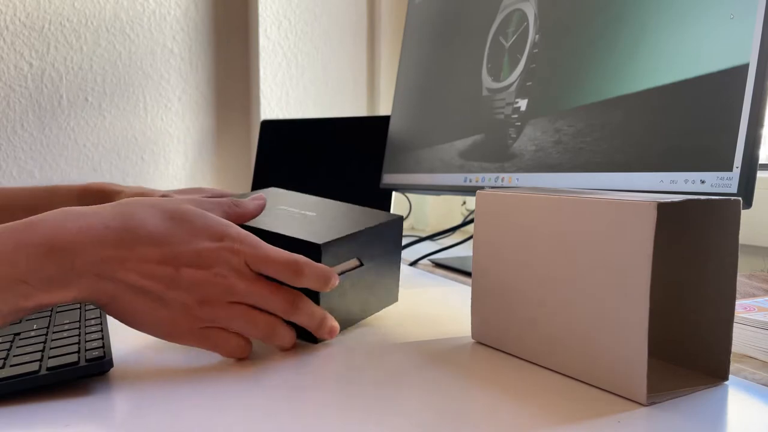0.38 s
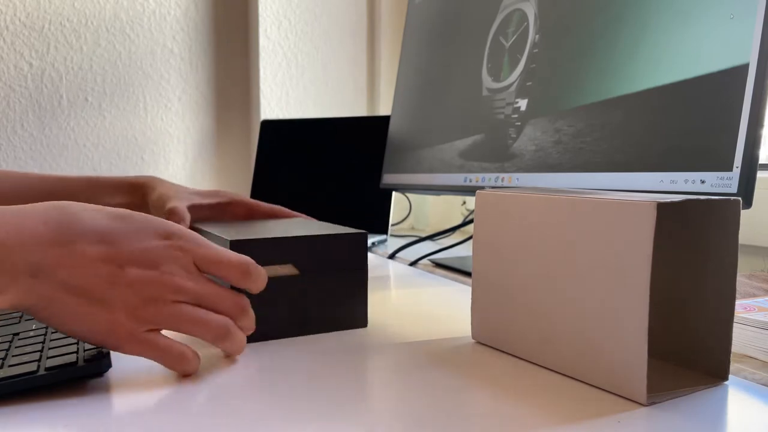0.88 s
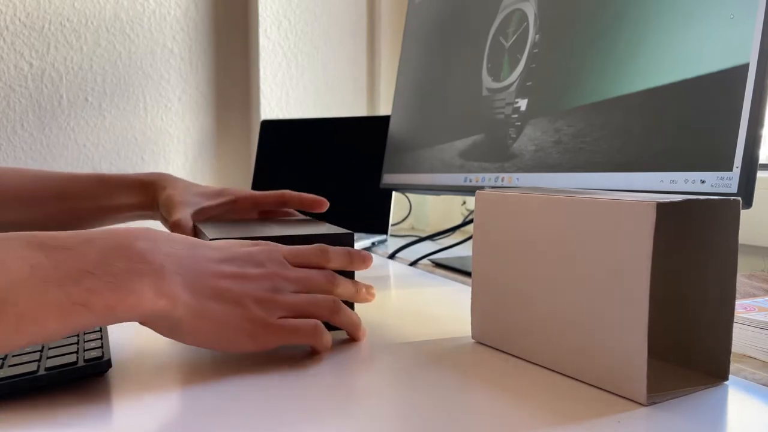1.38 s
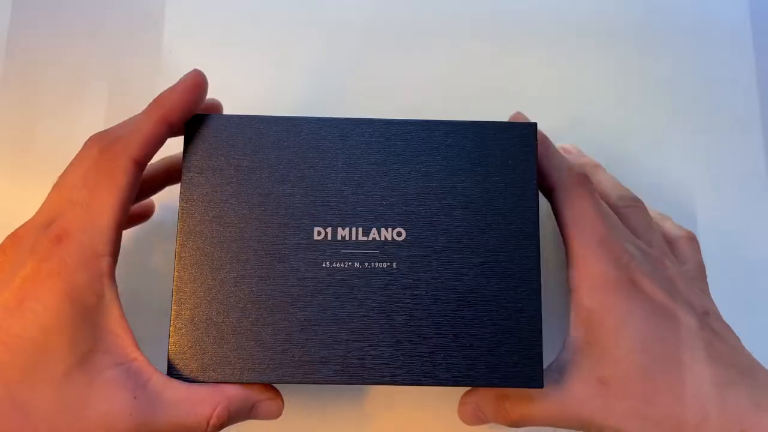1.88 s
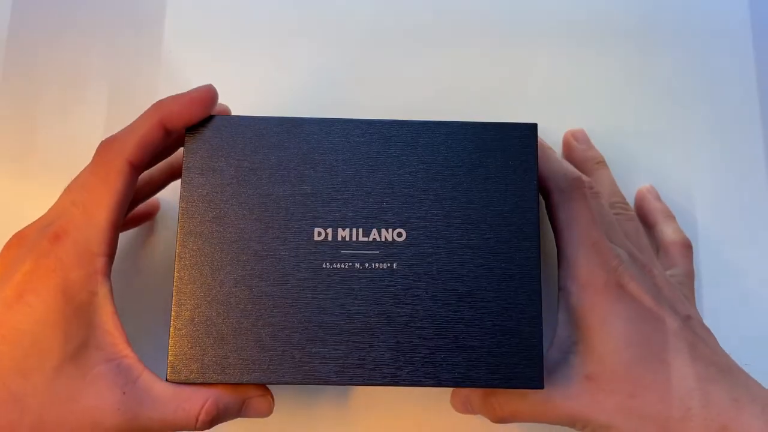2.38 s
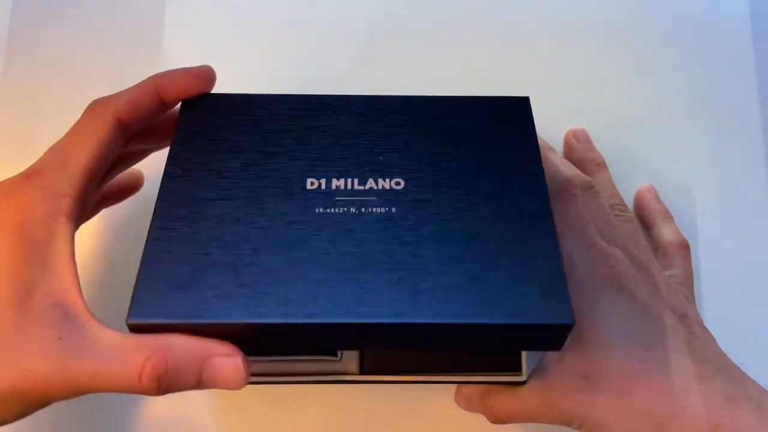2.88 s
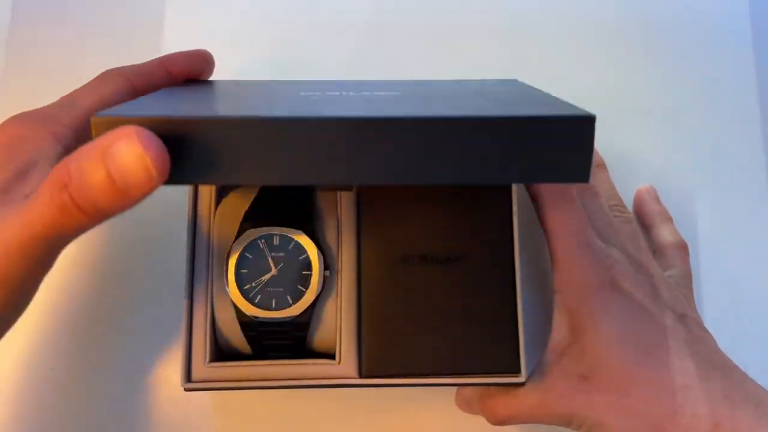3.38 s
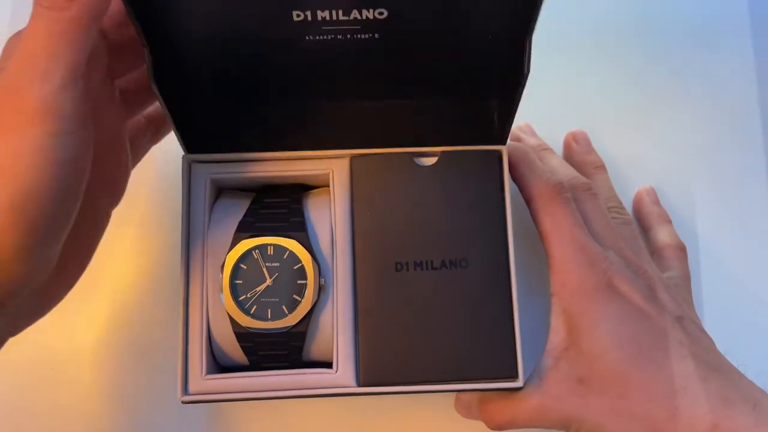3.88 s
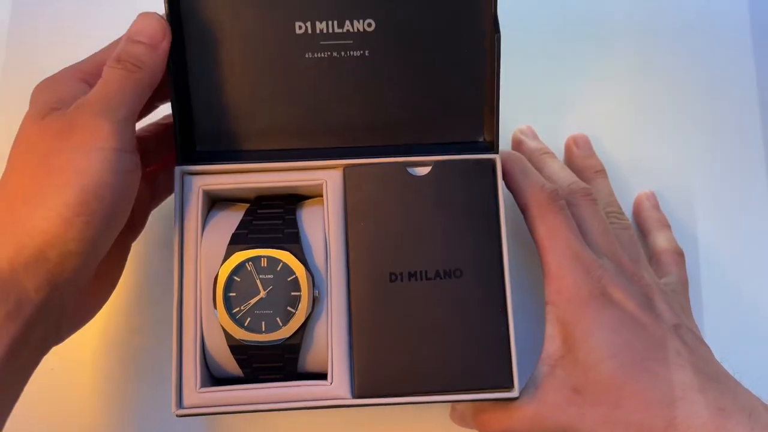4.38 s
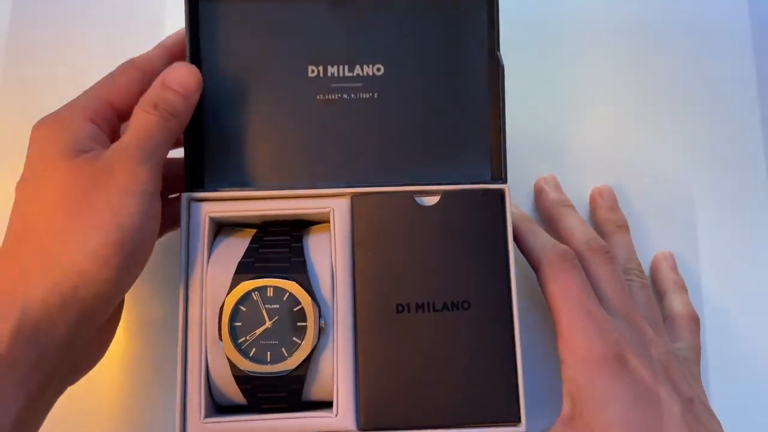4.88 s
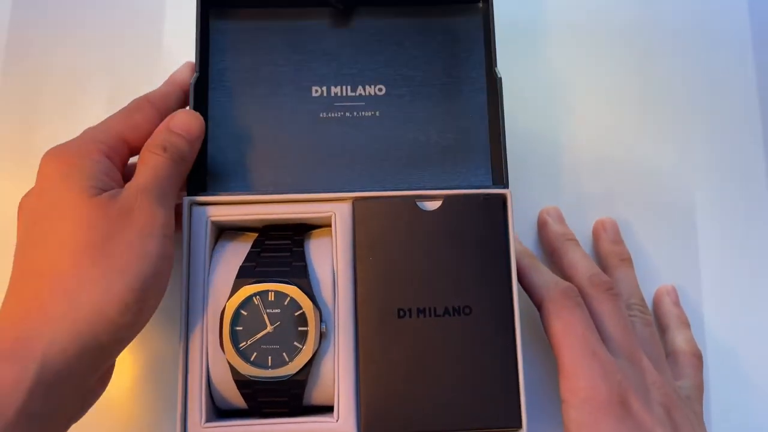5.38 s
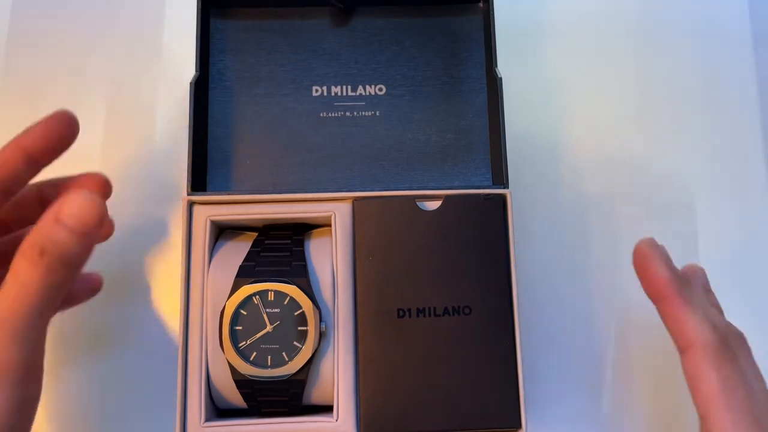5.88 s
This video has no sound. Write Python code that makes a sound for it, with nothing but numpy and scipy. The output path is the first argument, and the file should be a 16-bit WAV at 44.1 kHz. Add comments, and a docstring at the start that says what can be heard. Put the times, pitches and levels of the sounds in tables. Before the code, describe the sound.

Three hollow knocks of a cardboard box on a desk, then quiet lid taps, light scrapes and a low room hum that swells.

```python
"""Hands set a stiff cardboard box down on a wooden desk (three knocks): each push rings box panels and desk top.
They slide the box; then, in a second shot heard from close above, lift its lid: soft taps made in the same way.
Filtered noise makes the rest: short bursts for skin and paper ticks, long swells for card and fingertip rubs.
Fading noise rings as a small room; low wavering noise is a fan and far traffic humming through desk and walls."""
import sys
import numpy as np
from scipy import signal
from scipy.fft import rfft, irfft
from scipy.io import wavfile
from scipy.ndimage import uniform_filter1d

SR = 44100
rng = np.random.default_rng(int(sys.argv[2]) if len(sys.argv) > 2 else 0)


def invert_db(x):
    """Field ratio 10**(x/20) for x, a level in decibels (scalar or array-like)."""
    u = np.asarray(x, float) / 20
    return 10 ** u


def store_pcm(level_fs):
    """Save levels as 16-bit WAV."""
    pcm = np.round(np.clip(level_fs, -1, 1) * 32767).astype(np.int16)
    wavfile.write(sys.argv[1], SR, np.atleast_2d(pcm).T)


N = 264600  # samples: six seconds

T = np.arange(N) / SR  # time of each sample [s]
STEPS = T[::SR // 500]  # coarser times for slow level curves [s]
HZ = np.maximum(np.fft.rfftfreq(N, 1 / SR), 1)
CUT_S = 1.812  # cut between two shots, the second from close above [s]


def colour(table):
    """Gain at every frequency, drawn through (frequency [Hz], gain [dB]) points."""
    hz, db = np.transpose(table)
    return invert_db(np.interp(np.log(HZ), np.log(hz), db))


def shape(x, gain):
    """Filters a sound and brings it to rms 1."""
    y = irfft(rfft(x) * gain, N)
    return y / y.std()


def placed(x, near, above):
    """Gives a sound one colour before the cut and another after."""
    return np.where(T < CUT_S, shape(x, colour(near)), shape(x, colour(above)))


def band(lo_hz, hi_hz):
    """Gain that lets a band through, with soft edges."""
    low_edge = 1 + (lo_hz / HZ) ** 6
    high_edge = 1 + (HZ / hi_hz) ** 6
    return 1 / np.sqrt(low_edge * high_edge)


def walk(rate_hz, count=N):
    """Random levels, each held for 1 / rate_hz seconds, joined by straight slopes."""
    hold = int(SR / rate_hz)
    levels = rng.standard_normal(count // hold + 1)
    return uniform_filter1d(np.repeat(levels, hold), hold)[:count]


def grit(spread_db, flicker_db):
    """Noise as dense tiny catches of uneven size, with a flickering level."""
    level_db = spread_db * rng.exponential(size=N) + flicker_db * walk(40)
    return rng.standard_normal(N) * invert_db(level_db)


def swells(rows):
    """One gain curve per row, rising to its peak and falling away at steady dB rates."""
    peak_s, rise_s, fall_s, db = np.transpose(rows)[:4, :, None]
    distance = np.maximum((peak_s - STEPS) / rise_s, (STEPS - peak_s) / fall_s)
    return invert_db(db - 20 * distance)


def together(*gains):
    """Unrelated sounds add in power; the sum becomes one gain per sample."""
    power = (np.vstack(gains) ** 2).sum(axis=0)
    return np.interp(T, STEPS, np.sqrt(power))


# how the hum's level drifts: (time [s], drone level [dB], rumble level [dB])
HUM_LEVELS = [(0.0, -68, -68), (0.2, -68, -70), (1.2, -62, -64), (1.5, -66, -66), (1.8, -63, -68),
              (1.9, -70, -70), (2.35, -72, -68), (2.45, -63, -66), (2.85, -67, -63), (3.36, -72, -68),
              (3.45, -64, -65), (3.8, -61, -62), (4.18, -60.5, -59), (4.54, -58, -57), (4.75, -54.5, -55),
              (5.1, -57, -60), (5.35, -56.5, -56), (5.65, -58.5, -59), (6.0, -58, -55)]
# slow swells of low rumble and desk drone, some under the lid drag:
# (peak time [s], rise [s per 20 dB], fall [s per 20 dB], rumble level [dB], desk drone above rumble [dB])
LOW_SWELLS = [(1.2, .6, .6, -70, 9), (2.1, .5, .5, -72, 8), (2.56, .2, .3, -53, 4),
              (2.67, .15, .2, -44, -5), (3.22, .25, .11, -57, -18), (3.94, .2, .08, -58, 5)]
# colour of the drone and rumble: (frequency [Hz], gain [dB])
DRONE_COLOUR = [(12, -41), (20, -10.5), (69, 1), (92, -2.5), (145, -4.5), (221, -7.5), (255, -1.5),
                (281, -1), (305, -1.5), (324, -21), (351, -9), (556, -13), (666, -8), (1320, -20.5),
                (2400, -45), (3120, -66), (5280, -120)]
# resonances of desk and room: (frequency [Hz], width [Hz], height [dB])
DRONE_PEAKS = [(75, 35, 6), (276, 22, 7), (690, 60, 4)]
# colour of the still floor: (frequency [Hz], gain [dB])
STILL_COLOUR = [(12, -28.5), (20, -1), (60, 1.5), (199, -4), (287, -9), (359, -11.5), (685, -16),
                (2420, -36.5), (5930, -39), (7220, -43), (7850, -55), (12300, -46.5), (16300, -57.5)]
STILL_DB = -62.5
DESK_NEAR_DB, DESK_ABOVE_DB = -1, 2.5  # desk drone over the drone level, before and after the cut


def hum():
    """Low noise in three wavering layers, with resonances of desk and room, over a still floor."""
    s, drone_db, rumble_db = np.transpose(HUM_LEVELS)
    drone = invert_db(np.interp(STEPS, s, drone_db))
    rumble = invert_db(np.interp(STEPS, s, rumble_db))
    rumble_swells = swells(LOW_SWELLS)
    desk_swells = rumble_swells * invert_db(np.array(LOW_SWELLS)[:, 4:])
    desk_db = np.where(STEPS < CUT_S, DESK_NEAR_DB, DESK_ABOVE_DB)
    layers = [  # gain, lowest Hz, highest Hz, waver in dB
        (together(rumble, rumble_swells), 15, 160, 2.5),
        (together(drone * invert_db(desk_db), desk_swells), 160, 450, 2.5),
        (together(drone), 450, 2600, 1.2),
    ]
    peaks = invert_db(sum(db / (1 + (2 * (HZ - hz) / width) ** 2) for hz, width, db in DRONE_PEAKS))
    out = invert_db(STILL_DB) * shape(rng.standard_normal(N), colour(STILL_COLOUR))
    for gain, lo_hz, hi_hz, waver_db in layers:
        tone = colour(DRONE_COLOUR) * peaks * band(lo_hz, hi_hz)
        layer = shape(rng.standard_normal(N), tone)
        out = out + gain * invert_db(waver_db * walk(11)) * layer
    return out


# how strong the hum's side signal is: (frequency [Hz], gain [dB])
HUM_SIDE = [(60, -17.5), (110, -5.5), (200, -15.5), (380, -2), (700, -0.5), (1290, 0.5), (2380, 4),
            (4400, 0.5), (8120, 0.5), (15000, -12)]


def hum_all_round():
    """Hum arriving from all round: the side signal is a second, unrelated stretch of noise."""
    mid = hum()
    side = irfft(rfft(hum()) * colour(HUM_SIDE), N)
    return np.array([mid + side, mid - side])


# how the room's tail dies away: (band centre [Hz], time to fall 60 dB [s], level [dB])
ROOM_BANDS = [(100, 0.34, -6), (253, .5, -5), (500, 0.82, -4.5), (1000, 0.45, 0.5), (2000, 0.65, 0),
              (4030, .55, 6), (8000, 0.1, -4.5)]


def room(x):
    """Diffuse tail: octave bands of noise dying at their own rates, mid and an unrelated twin."""
    tails = np.zeros((2, N))
    for hz, t60, db in ROOM_BANDS:
        build_up = 1 - np.exp(-(T / 0.0027) ** 2)
        fade = invert_db(db) * np.exp(-np.log(1000) * T / t60) * build_up
        octave = band(hz / np.sqrt(2), hz * np.sqrt(2))
        tails += fade * irfft(rfft(rng.standard_normal((2, N))) * octave, N)
    return irfft(rfft(tails / np.sqrt(SR / 20)) * rfft(x), N)


# side signal of the microphone pair, before and after the cut: (frequency [Hz], gain [dB])
SIDE_NEAR = [(60, -13), (110, -10.5), (200, -9), (380, -5), (700, -0.5), (1290, -1), (2380, -2), (4400, -4),
             (8120, 0), (15000, 7)]
SIDE_ABOVE = [(60, -13), (110, -55), (200, -36), (380, 2), (700, 6), (1290, -5), (2380, 7.5), (4400, -3),
              (8120, 24.5), (15000, -8)]


def ports(mid, other):
    """Two microphone ports: the side signal is the same sound turned in phase, plus an unrelated one."""
    # the bass leans to the right port; higher up the ports differ by time, a quarter turn
    lean = 1 / (1 + (HZ / 350) ** 4)
    mid_f, other_f = rfft(mid), rfft(other)
    near_turn = np.exp(1j * (np.pi / 2 + 0.05 + 1.2 * lean))
    above_turn = np.exp(1j * (np.pi / 2 + 0.1 + 0.76 * lean))
    near = (0.71 * mid_f * near_turn + 1.2 * other_f) * colour(SIDE_NEAR)
    above = (0.3 * mid_f * above_turn + 0.26 * other_f) * colour(SIDE_ABOVE)
    side = np.where(T < CUT_S, irfft(near, N), irfft(above, N))
    return np.array([mid + side, mid - side])


# swells of card body and scrape: slides, and at .67 the dying tail of the third knock:
# (peak time [s], rise [s per 20 dB], fall [s per 20 dB], card body level [dB], scrape above body [dB])
CARD_SWELLS = [(.22, .1, .3, -71, -12), (.46, .12, .6, -50, -11), (.67, .04, .24, -39, -24),
               (.94, .6, .1, -61, -3), (1.064, .05, .07, -60, -12), (1.7, .2, .25, -68, -20),
               (2.43, .03, .3, -65, -30), (2.628, .045, .1, -45, -16), (2.9, .3, .3, -70, -22),
               (3.17, .15, .15, -73, -15), (3.43, .03, .2, -64, -14), (3.67, .15, .25, -66, -22),
               (3.85, .16, .3, -68, -9), (3.946, .09, .055, -59.5, -16), (4.21, .08, .2, -67, -15),
               (4.35, .2, .07, -72, -9), (4.65, .19, .26, -53, -14), (4.83, .15, .11, -52.5, -11),
               (5.094, .12, .8, -76, -6)]
# fingertips brushing paper: (peak time [s], rise [s per 20 dB], fall [s per 20 dB], hiss level [dB])
BRUSHES = [(.214, .05, .4, -83), (.46, .06, .2, -84), (.6, .2, .15, -78), (.9, .6, .5, -83),
           (1.064, .04, .055, -60.5), (1.2, .4, .17, -75), (1.9, .15, .4, -85), (2.628, .047, .08, -68.5),
           (3.17, .25, .15, -85), (3.78, .12, .3, -85), (3.946, .12, .1, -74.5), (4.16, .08, .3, -85),
           (4.37, .15, .07, -87), (4.65, .3, .4, -85), (4.842, .13, .08, -69), (5.15, .3, .9, -92)]
# faint rubbing that never stops: (scrape level [dB], body level [dB], skin level [dB])
HOLD_DB = (-90, -85, -100)
# colour of the humming box body: (frequency [Hz], gain [dB])
BODY_COLOUR = [(410, -35.5), (700, -6), (948, 2.5), (1170, -6.5), (1650, -5), (2230, -11.5), (2620, -17),
               (3500, -20.5), (4550, -47.5), (7700, -120)]
# colour of scraping card, before and after the cut: (frequency [Hz], gain [dB])
CARD_NEAR = [(1470, -31), (2500, -1), (5020, -4.5), (6220, -9.5), (7960, -26.5), (9000, -16), (11700, -53),
             (19800, -120)]
CARD_ABOVE = [(1470, -24), (2500, -11.5), (2900, 1), (6120, -5), (7500, -20), (8090, -42), (9000, -26),
              (11700, -62), (19800, -120)]
# colour of skin, in rubs and ticks, before and after the cut: (frequency [Hz], gain [dB])
SKIN_NEAR = [(4120, -39), (7000, -7.5), (7980, -10.5), (9260, -4.5), (11000, 0.5), (13600, -9),
             (14500, -27.5)]
SKIN_ABOVE = [(4410, -25), (7500, -8), (8460, -40), (8880, -8), (9750, -2.5), (12200, -1), (14500, 2.5),
              (15500, -0.5), (16300, -13.5)]
HOLD_WANDER_DB = 3.5
BRUSH_SCRAPE_DB = 2  # card scrape over the hiss of each brush


def rub():
    """Card scrapes card, the box body hums along, fingertips hiss over the paper."""
    card_swells, brushes = swells(CARD_SWELLS), swells(BRUSHES)
    hold = [invert_db(db + HOLD_WANDER_DB * np.interp(STEPS, T, walk(6))) for db in HOLD_DB]
    scrape_swells = card_swells * invert_db(np.array(CARD_SWELLS)[:, 4:])
    card = together(scrape_swells, brushes * invert_db(BRUSH_SCRAPE_DB), hold[0])
    body = together(card_swells, hold[1])
    skin = together(brushes, hold[2])
    scrape = card * placed(grit(1.5, 1.8), CARD_NEAR, CARD_ABOVE)
    body_hum = body * shape(grit(1.5, 1.2), colour(BODY_COLOUR))
    hiss = skin * placed(grit(1.2, 1.2), SKIN_NEAR, SKIN_ABOVE)
    return scrape + body_hum + hiss


# dry ticks of skin and paper letting go:
# (time [s], thin paper level [dB], card level [dB], skin level [dB])
TICKS = [(0.207, -80, -64, -90), (0.2897, -68.5, -47, -77), (0.4369, -63, -28, -61),
         (0.6476, -51, -23.5, -56), (1.227, -82, -63, -85), (1.656, -67.5, -68.5, -78),
         (2.5187, -79, -68, -69), (2.5601, -85, -70, -70), (2.5888, -84, -73, -68.5),
         (2.6044, -78, -59, -60), (2.6314, -58, -46, -57), (2.8878, -73, -80, -74), (2.8955, -63, -82, -69),
         (2.9213, -89, -75.5, -72), (3.0318, -67, -57, -61.5), (3.4102, -62, -49, -73),
         (3.5392, -73, -58, -86), (4.432, -90, -64, -88)]


def ticks():
    """Noise bursts a few milliseconds long: thin paper, thicker card and skin each add their band."""
    rise_s = np.array([[0.0012], [0.0015], [0.0008]])  # time to the peak: thin, card, skin
    t = T[:SR // 40] / rise_s
    pulse = t * np.exp(1 - t)
    length = t.shape[1]
    gates = np.zeros((3, N + length))
    for s, *db in TICKS:
        i = int(s * SR)
        gates[:, i:i + length] += invert_db(np.array(db))[:, None] * pulse
    thin, card, skin = gates[:, :N]
    air = rng.standard_normal(N)
    thin_snap = thin * shape(air, band(3800, 7000) ** 2)
    card_snap = card * shape(air, band(1100, 2700) ** 2)
    skin_snap = skin * placed(air, SKIN_NEAR, SKIN_ABOVE)
    return thin_snap + card_snap + skin_snap


def ring(modes, t, swing):
    """Struck modes of alternating sign, one row each: they swing in over about `swing` cycles, then die."""
    hz, db, t60 = np.transpose(modes)[..., None]
    sign = (-1.) ** np.arange(len(hz))[:, None]
    fade = (1 - np.exp(-t * hz / swing)) * np.exp(-np.log(1000) * t / t60)
    return sign * invert_db(db) * np.sin(2 * np.pi * hz * t) * fade


def spot(modes, hz, width):
    """The struck spot favours the modes near its own pitch: weight 1 there, less further away."""
    return np.exp(-(np.log(np.array(modes)[:, 0] / hz) / width) ** 2)


# blows of box on desk and lid on box:
# (time [s], box peak level [dB], box ring pitch [Hz], contact [ms], desk gain over box level [dB])
BLOWS = [(0.205, -50, 1500, .3, -17), (0.229, -44, 520, 0.58, -12), (0.2896, -14, 900, 0.61, -6),
         (0.2928, -16, 380, 0.2, -18), (0.429, -30, 800, .5, -23), (0.4375, -10, 600, .3, -9.5),
         (0.4397, -9.5, 500, 0.51, -19), (0.45, -21.5, 900, .3, -15.5), (.489, -23, 480, .6, -22),
         (0.6458, -21.5, 2400, .08, -14), (0.647, -12, 700, .25, -5), (.6500, -10, 430, .4, -14),
         (0.6579, -16.5, 1394, .15, -12.5), (2.423, -49, 900, 0.32, -10), (2.612, -40, 900, 0.4, -14),
         (2.629, -35, 900, 0.45, -14), (2.635, -28.5, 296, 0.58, -17), (2.648, -37.5, 290, 0.42, -17),
         (3.032, -45, 940, 0.058, -26), (3.4085, -38.5, 1700, 0.16, -25.5), (3.411, -34, 357, 0.18, -23),
         (3.539, -46, 806, .15, -26), (3.543, -37, 290, 0.6, -22), (4.431, -40.5, 820, 0.091, -29),
         (4.851, -42.5, 290, 0.64, -8), (5.267, -43.5, 278, 0.31, -16.5)]
# ringing modes of desk top and box panels: (frequency [Hz], level [dB], time to fall 60 dB [s])
DESK_MODES = [(62, -21, .25), (84, -17, 0.26), (120, -12, 0.47), (163, -13, 0.55), (186.7, -13, 0.85),
              (195.14, 4.5, .33), (246, -9.5, .35), (404, -21.5, 0.43), (435, -12, .65), (462, -18.5, 0.29),
              (520, -16, 0.5), (600, -26, 0.5), (670, -30, .4), (825, -24.5, 0.5)]
BOX_MODES = [(287, 2, .05), (397.7, -0.5, 0.044), (515, 5, 0.045), (660, 1.5, 0.028), (900, 10.5, 0.014),
             (1370, 18, 0.0075), (1490, 0, 0.075), (1980, 10.5, 0.0067), (2400, -14, .012),
             (3100, 1.5, 0.0066)]
# the room gets more of low, broad blows, and less in the second shot, from close above
SEND_NEAR_DB, SEND_ABOVE_DB, SEND_DB_PER_OCTAVE = -2.5, -10, -4.5


def blows():
    """A short push rings box panels and desk top; returns the sound and what the room gets."""
    t, short = T[:SR // 2], T[:SR // 8]
    desk_ring = ring(DESK_MODES, t, swing=0.9)
    box_ring = ring(BOX_MODES, short, swing=0.4)
    # each desk mode wavers randomly in level, the same way in every blow
    desk_ring = desk_ring * invert_db([2.6 * walk(43, count=len(t)) for _ in DESK_MODES])
    out, send = np.zeros((2, N + len(t)))
    for s, db, hz, ms, desk_db in BLOWS:
        i = int(s * SR)
        # a softer contact is a longer, smoother push
        push = short * np.exp(-short * 3000 / ms)
        struck = spot(BOX_MODES, hz, 0.49) @ box_ring
        box = signal.fftconvolve(struck, push)[:len(short)]
        box = invert_db(db) * box / abs(box).max()
        # modes near the struck pitch gain up to 2.9 dB
        desk = invert_db(db + desk_db) * (invert_db(2.9 * spot(DESK_MODES, hz, 0.25)) @ desk_ring)
        out[i:i + len(short)] += box
        out[i:i + len(t)] += desk
        room_db = SEND_NEAR_DB if s < CUT_S else SEND_ABOVE_DB
        room_db += SEND_DB_PER_OCTAVE * np.log2(hz / 500)
        send[i:i + len(short)] += invert_db(room_db) * box
        send[i:i + len(t)] += invert_db(-17.5) * desk
    return out[:N], send[:N]


DIP_S, DIP_DB = 0.036, -11  # the level dips briefly at the cut: length [s], depth [dB]


def scene():
    """Blows, ticks and rubs through the ports and the room; the hum arrives from all round."""
    knock, send = blows()
    snap, rubbing = ticks(), rub()
    snap_send = invert_db(np.where(T < CUT_S, -9.5, -15)) * snap
    wet, twin = room(send + snap_send)
    # a second, unrelated rub goes to the side signal only
    close = ports(knock + snap + rubbing + wet, twin + rub())
    in_dip = (T > CUT_S) & (T < CUT_S + DIP_S)
    dip = uniform_filter1d(invert_db(DIP_DB * in_dip), size=100)
    return (close + hum_all_round()) * dip


def roll_off(x):
    """The treble ends steeply here."""
    return signal.sosfilt(signal.butter(12, 16430, fs=SR, output="sos"), x)


def record(dry):
    """Bass below about 25 Hz fades out and everything from 16 kHz up is cut."""
    gain = band(25, 30000) * (HZ < 16000)
    mix = irfft(rfft(dry) * gain, N)
    return roll_off(mix)


dry = scene()
out = record(dry)
store_pcm(out)
```